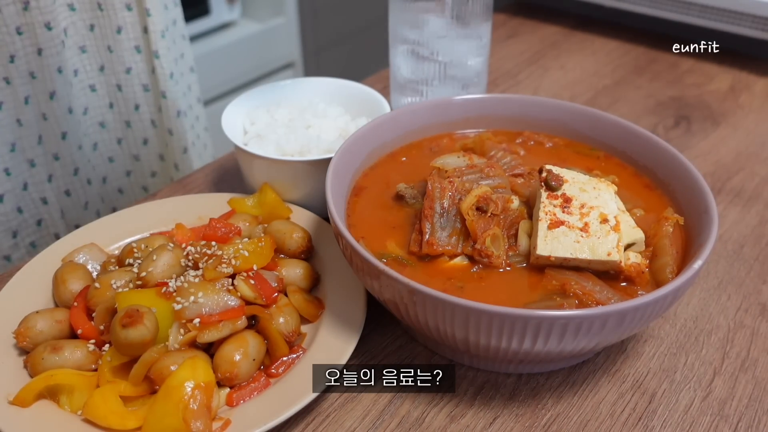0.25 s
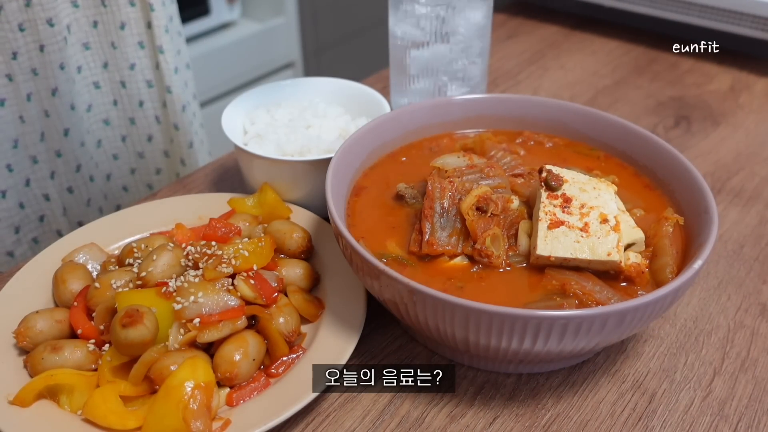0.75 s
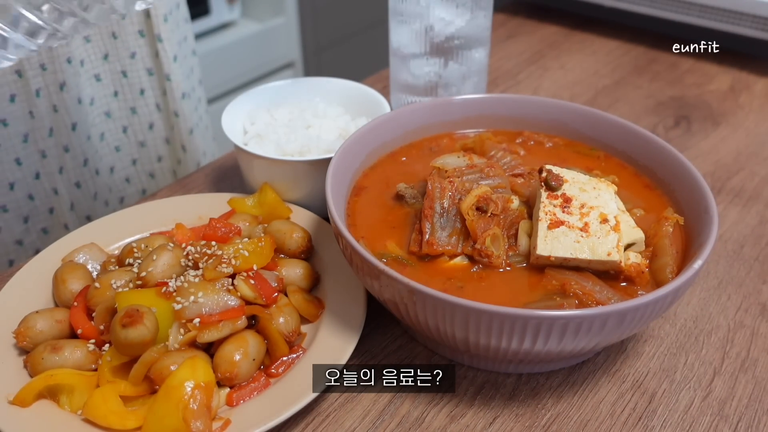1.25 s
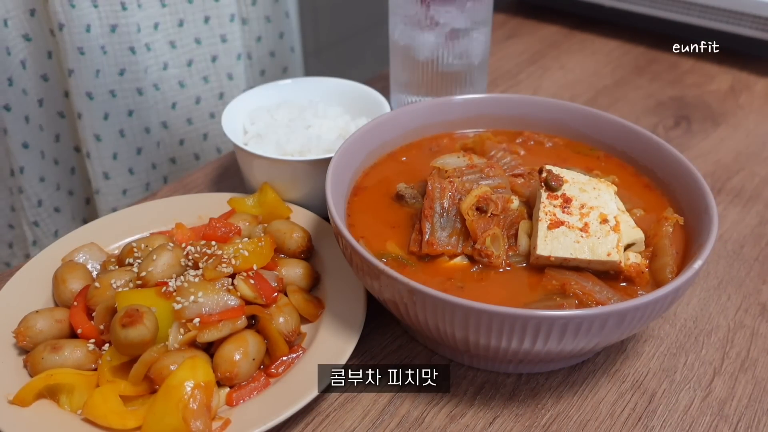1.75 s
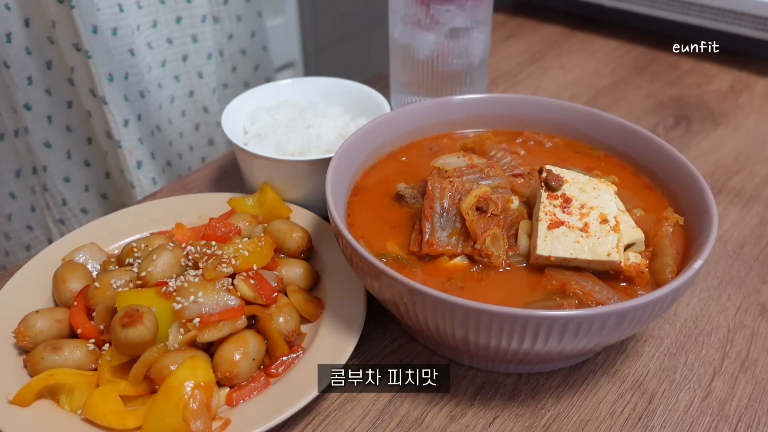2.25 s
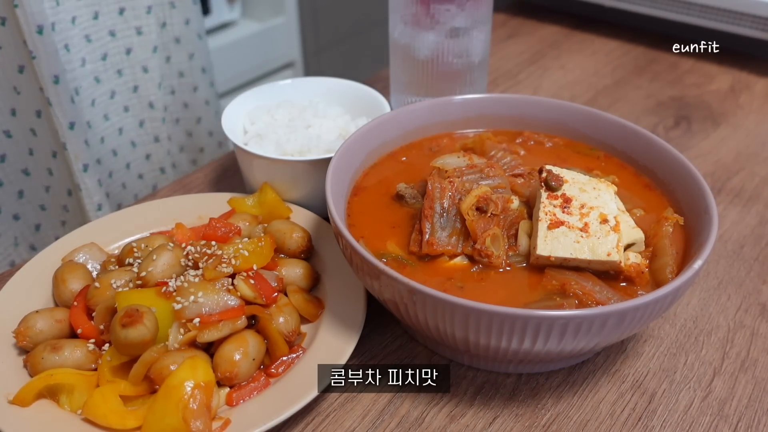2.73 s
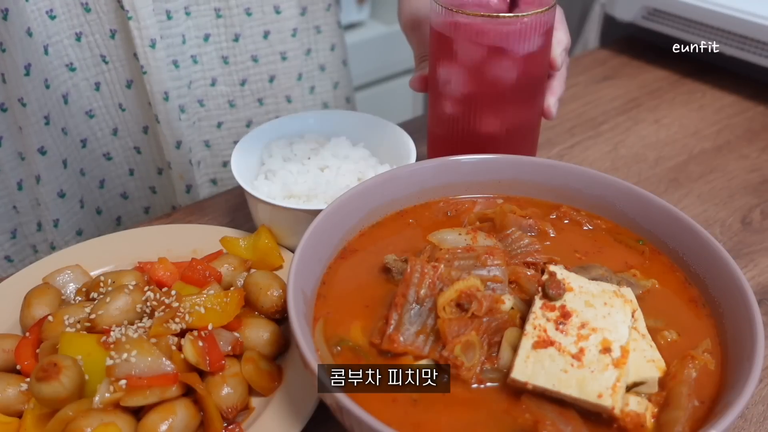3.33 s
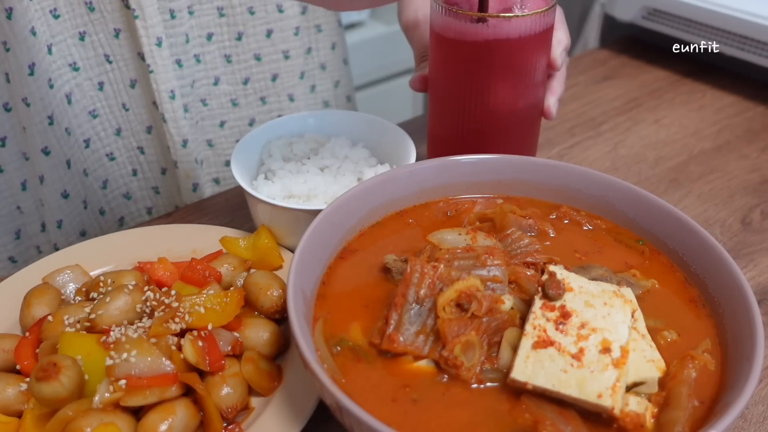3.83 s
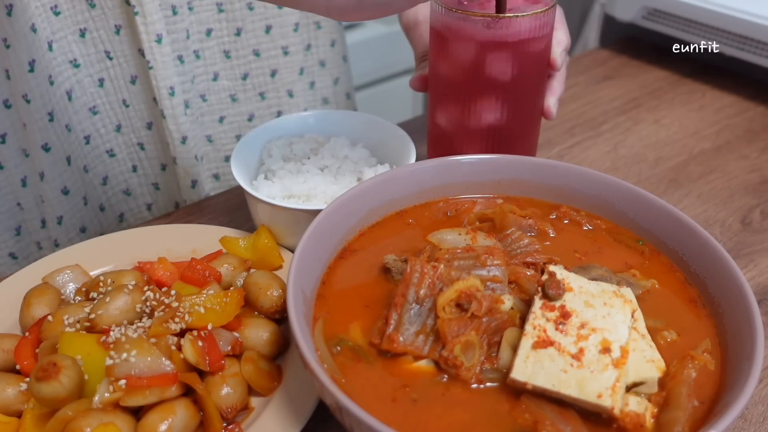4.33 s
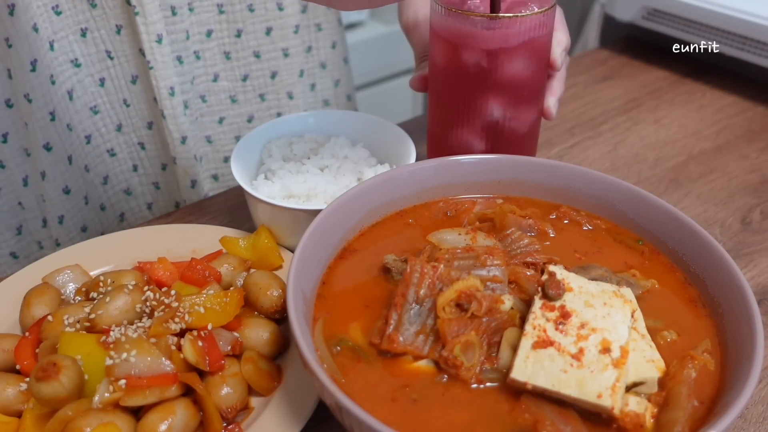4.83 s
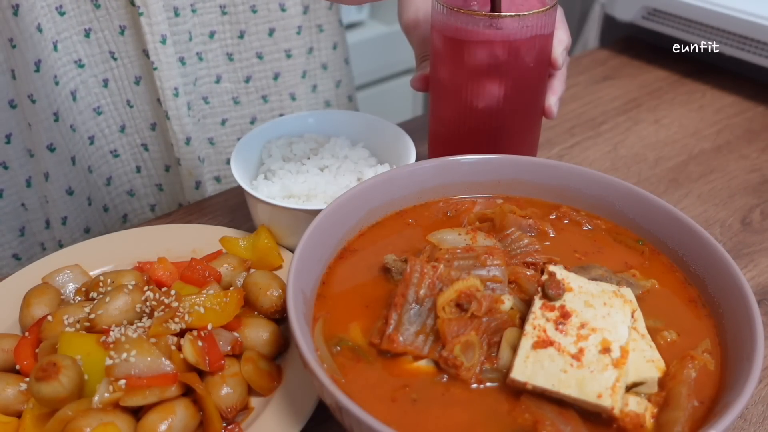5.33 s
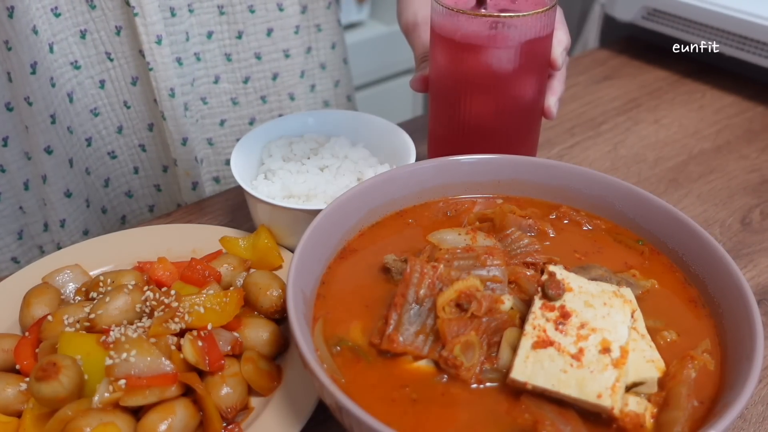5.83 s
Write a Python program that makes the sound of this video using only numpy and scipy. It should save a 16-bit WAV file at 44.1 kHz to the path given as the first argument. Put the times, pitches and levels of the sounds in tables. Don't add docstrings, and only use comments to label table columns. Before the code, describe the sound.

Close in a small room: crackling ice under poured water, a crinkling powder sachet, then dense wet clinking of ice stirred in a glass.

```python
import sys
import numpy as np
from scipy import signal
from scipy.fft import rfft, irfft, next_fast_len
from scipy.io import wavfile
from scipy.ndimage import uniform_filter1d

SR = 44100
rng = np.random.default_rng(int(sys.argv[2]) if len(sys.argv) > 2 else 0)


def store_pcm(level_fs):
    pcm = np.round(np.clip(level_fs, -1, 1) * 32767).astype(np.int16)
    wavfile.write(sys.argv[1], SR, np.atleast_2d(pcm).T)


def ratio_of_db(decibels):
    return 10 ** (np.asarray(decibels, float) / 20)


N = 268128


def in_time(rows):
    start_s, *columns = np.transpose(rows)
    t = np.arange(N) / SR
    inside = (t > start_s[0] - 0.014) & (t < start_s[-1] + 0.012)
    return [np.where(inside, np.interp(t, start_s, column), -150) for column in columns]


def unit_rms(x):
    return x / np.sqrt(np.mean(x ** 2) + 1e-20)


def ring(x, hz, t60_s):
    radius = ratio_of_db(-60 / (t60_s * SR))
    w = 2 * np.pi * np.minimum(hz, 0.45 * SR) / SR
    return signal.lfilter([0, np.sin(w)], [1, -2 * radius * np.cos(w), radius * radius], x + 1e-18)


def fade(x, seconds):
    return signal.lfilter([1], [1, -np.exp(-1 / (seconds * SR))], x + 1e-18)


def train(times_s, gains):
    out = np.zeros(N)
    np.add.at(out, (np.asarray(times_s) * SR).astype(int), gains)
    return out


def contact(times_s, level_db, seconds):
    return fade(fade(train(times_s, ratio_of_db(level_db)), seconds), 0.0002) / (0.00018 * SR)


def touches(t0_s, t1_s, count, spread_db):
    s, size = rng.random((count, 2)).T
    s = t0_s + (t1_s - t0_s) * s
    return s, (s * SR).astype(int), spread_db * np.minimum(-np.log(1 - size), 2.5)


def wavering(hz, blur_hz, size=N):
    jitter = np.sqrt(2 * np.pi * blur_hz / SR) * rng.standard_normal(size)
    return np.sin(np.cumsum(2 * np.pi * hz / SR + jitter))


def above(x, cut_hz, order=3):
    return signal.sosfilt(signal.butter(order, cut_hz, "high", fs=SR, output="sos"), x)


def band(x, low_hz, high_hz):
    return signal.sosfilt(signal.butter(2, [low_hz, high_hz], "band", fs=SR, output="sos"), x)


def strike(times_s, level_db, modes, contact_s, spread_db, cut_hz, blur_hz):
    share = ratio_of_db(spread_db * rng.standard_normal((len(times_s), len(modes))) + np.array(modes)[:, 1])
    share /= np.sqrt(np.sum(share ** 2, axis=1, keepdims=True))
    share *= rng.choice([-1, 1], share.shape)
    out = 0
    for (hz, _, t60_s), own in zip(modes, share.T):
        swing = fade(train(times_s, ratio_of_db(level_db) * own), t60_s / np.log(1000))
        softened = fade(fade(swing, contact_s), contact_s) / (contact_s * SR) ** 2
        out = out + softened * wavering(hz, blur_hz)
    return above(out, cut_hz, order=4)


def grains(modes, per_s, spread_db):
    sizes = ratio_of_db(spread_db * np.minimum(rng.exponential(1, N), 5)) * rng.choice([-1, 1], N)
    sizes *= rng.random(N) < per_s / SR
    dealt = rng.integers(0, len(modes), N)
    out = 0
    for k, (hz, level_db, t60_s) in enumerate(modes):
        out = out + ring(sizes * (dealt == k) * ratio_of_db(level_db), hz, t60_s)
    return unit_rms(out)


def hiss(spectrum):
    hz, level_db = np.transpose(spectrum)
    grid_hz = np.maximum(np.fft.rfftfreq(N, 1 / SR), 1)
    gain = ratio_of_db(np.interp(np.log(grid_hz), np.log(hz), level_db))
    return unit_rms(irfft(rfft(rng.standard_normal(N)) * gain, N))


# start_s, peak_s, end_s, vigour_db, depth_db (depth in the drink)
STROKES = [(2.856, 2.92, 3.058, -15.5, -5), (2.987, 3.016, 3.29, -23, -7), (3.118, 3.14, 3.33, -20, -14),
           (3.186, 3.342, 3.529, -18, -12.5), (3.545, 3.587, 3.615, -31, 8.5),
           (3.631, 3.703, 3.74, -26, -3), (3.763, 3.785, 3.921, -22.5, -2.5),
           (3.866, 3.894, 4.018, -25.5, -1.5), (4.041, 4.069, 4.154, -21.5, -1),
           (4.257, 4.31, 4.36, -25, 1), (4.357, 4.491, 4.82, -21.5, -1.5), (4.693, 4.73, 4.852, -24, -1),
           (4.781, 4.87, 4.966, -26, 1), (4.895, 5.003, 5.046, -26, 0.8), (5.076, 5.214, 5.4, -32.5, 0),
           (5.412, 5.514, 5.66, -22, -2), (5.711, 5.713, 5.853, -27.5, -6.5),
           (5.8, 5.888, 6.047, -37, -6.5)]
RISE_DB, FALL_DB, ONSET_DB_PER_S, REST_DB = 7.5, 12, 902, -46.5


def strokes():
    t = np.arange(N // 16 + 1) * 16 / SR
    start_s, peak_s, end_s, level_db, depth_db = np.transpose(STROKES)[:, :, None]
    rising_db = RISE_DB * (peak_s - t) / (peak_s - start_s) + ONSET_DB_PER_S * np.maximum(start_s - t, 0)
    falling_db = FALL_DB * (t - peak_s) / (end_s - peak_s)
    each_db = level_db - np.where(t < peak_s, rising_db, falling_db)
    vigour_db = np.maximum(each_db.max(axis=0), REST_DB) - 150 * (t < start_s[0] - 0.01)
    depth_db = uniform_filter1d(depth_db[each_db.argmax(axis=0), 0], size=56)
    return np.repeat([vigour_db, depth_db], 16, axis=1)[:, :N]


# start_s, glass_db, tick_db
LONE_CLINKS = [(2.8601, -11, -10), (2.864, -10, -15), (2.8741, -11.5, -9), (2.879, -19, -26),
               (2.889, -16, -19), (2.9013, -14, -23), (2.9073, -17, -24), (2.913, -14, -24),
               (2.9187, -9.5, -14), (2.924, -16, -19), (2.929, -14.5, -24), (2.94, -20, -26),
               (2.971, -27, -42), (2.997, -24, -38), (3.023, -16.5, -24), (3.029, -17, -25),
               (3.055, -29.5, -37.5), (3.091, -27, -42), (2.983, -22, -54), (3.0097, -14.5, -8.5),
               (3.035, -17.5, -28), (3.0676, -23, -41), (3.121, -20, -11.5), (3.137, -17, -15),
               (3.144, -22, -22), (3.1646, -19, -17), (3.1785, -15, -23), (5.573, -22, -44),
               (5.608, -19.5, -35), (5.447, -17, -21), (5.639, -14.5, -37), (5.689, -29, -53),
               (5.7212, -14, -11), (5.7965, -29, -22), (5.819, -21, -20), (5.8443, -25, -21),
               (5.8726, -19, -22.5), (5.8966, -18.5, -18.5), (5.9398, -22, -45), (5.9747, -16.5, -40),
               (5.981, -22, -50), (6.0451, -23.5, -37)]
# start_s, glass_db, tick_db, hollow_db
RATTLE_FIRST = [(3.1922, -13.5, -18, -34.0), (3.2026, -12, -22.0, -30), (3.2177, -16, -19.0, -38),
                (3.228, -11, -18.0, -38), (3.2458, -11.5, -21, -34), (3.2577, -14.0, -27, -27),
                (3.2659, -11, -29, -30), (3.2823, -13.0, -27, -26.0), (3.2894, -11, -25, -25),
                (3.297, -11, -17.0, -21), (3.304, -10, -21, -21.5), (3.3112, -7, -18, -24),
                (3.326, -11.5, -14, -18), (3.335, -5, -14.5, -22), (3.3487, -11.5, -15.0, -23),
                (3.3562, -11, -14.0, -21), (3.362, -10, -18, -23.5), (3.37, -11, -13, -20),
                (3.3777, -11, -14, -26), (3.385, -16, -14, -25.0), (3.3932, -11.0, -16.0, -27),
                (3.4069, -14.5, -20, -25), (3.4217, -20, -15.0, -36), (3.4326, -8.5, -13, -30.0),
                (3.4473, -16, -18.5, -32.5), (3.4555, -19, -11, -33), (3.4653, -14.5, -12.5, -31.5),
                (3.4752, -22, -14, -34.5), (3.4877, -28, -18, -32), (3.5215, -26, -22.0, -31),
                (3.535, -27, -20, -39.0), (3.546, -24.5, -20, -31.5), (3.5584, -21.0, -29, -21.5),
                (3.5773, -21.5, -28.5, -13.5), (3.6352, -20, -23.0, -25), (3.641, -17, -37, -26.0),
                (3.6552, -21, -35, -26), (3.6652, -16, -19, -25.5), (3.6768, -21, -29, -23.0),
                (3.6871, -19.0, -21, -23.5), (3.702, -17.5, -26.5, -18.5), (3.7175, -15, -25.0, -23.0),
                (3.7278, -11.5, -23.0, -15.0), (3.7377, -21.5, -26.0, -20), (3.7536, -19, -30, -18.5),
                (3.773, -14.0, -16.5, -16)]
RATTLE_MIDDLE = [(3.787, -12, -34, -25), (3.795, -16.0, -34, -23.5), (3.832, -16, -32, -25.5),
                 (3.8474, -15, -24, -15), (3.857, -17, -29, -20.0), (3.8713, -20, -34, -32),
                 (3.886, -17, -21, -22), (3.894, -6, -19, -16), (3.9085, -16.5, -27.0, -26),
                 (3.9344, -18.5, -16, -29.5), (3.94, -14, -19.5, -24), (3.9546, -20.0, -24.0, -31),
                 (3.976, -18.5, -22.5, -22), (4.0502, -16, -27, -20.5), (4.063, -11.5, -14, -9.5),
                 (4.077, -19, -21, -13.5), (4.086, -11, -20.5, -27), (4.0964, -12, -20, -13.5),
                 (4.1097, -16, -29.5, -17), (4.2037, -26.5, -41, -31), (4.2134, -26.5, -41.5, -30),
                 (4.2677, -15, -23.0, -24), (4.2829, -19, -24, -19), (4.3003, -12, -25.0, -23),
                 (4.309, -7, -21.0, -23), (4.3197, -14.5, -23.0, -26.0), (4.3273, -9, -24, -21.5),
                 (4.3558, -14.5, -24.5, -33), (4.3789, -20, -15, -30.0), (4.3928, -11, -11.5, -13.5),
                 (4.425, -16, -21.0, -29), (4.4443, -10.5, -15, -25), (4.4553, -11, -27, -28),
                 (4.473, -11, -28, -25), (4.4866, -9, -23.0, -22), (4.4992, -9, -22, -21),
                 (4.506, -14, -22, -19), (4.526, -15, -29, -29), (4.5404, -18, -31, -30),
                 (4.545, -16, -30, -28), (4.5589, -13, -21, -23.5), (4.5638, -14, -24, -23.0),
                 (4.5862, -21.0, -33, -26), (4.6259, -15, -23.5, -16), (4.6429, -20, -28, -26.0),
                 (4.6506, -20.0, -25, -20)]
RATTLE_LAST = [(4.7004, -16.5, -24, -15), (4.7111, -11, -31, -16), (4.7286, -16, -32, -27),
               (4.7452, -13, -34, -21), (4.7557, -14.5, -27, -22.5), (4.7742, -15, -25.0, -19),
               (4.7955, -11.5, -25, -19), (4.8194, -25.0, -35, -29), (4.834, -24.5, -37.0, -26),
               (4.8437, -19.0, -25, -24.0), (4.8549, -17.5, -20.5, -23), (4.894, -28, -30.0, -19),
               (4.9034, -17.0, -21.5, -20.5), (4.93, -20.0, -33.0, -16), (4.9438, -14.5, -18.5, -22.0),
               (4.954, -19, -30, -25), (4.9663, -7, -31, -20), (4.9904, -14, -36, -17.0),
               (5.0018, -14, -27, -24), (5.0156, -16, -37, -26.0), (5.0234, -11, -18.5, -18),
               (5.075, -22, -32.0, -26.5), (5.1201, -27.0, -37, -33.5), (5.1264, -21.5, -37.5, -27),
               (5.1423, -28, -27, -26), (5.1707, -23, -36.5, -24), (5.191, -26.0, -37.5, -30),
               (5.1986, -18, -38.5, -30.0), (5.208, -14, -23, -26), (5.236, -16, -25, -28),
               (5.246, -17, -21, -22.5), (5.253, -17.5, -29.0, -31), (5.279, -21, -27, -28.5),
               (5.303, -23, -23, -40.5), (5.3512, -36.0, -43.5, -30.0), (5.3705, -25, -35, -33.5),
               (5.4157, -23.0, -40, -43), (5.4253, -21, -37, -42), (5.4545, -16, -19.5, -21),
               (5.4677, -16, -42, -23), (5.4756, -7, -30, -15.5), (5.4895, -21.0, -22.5, -18),
               (5.5047, -13.0, -16, -18.0), (5.526, -10, -13, -20), (5.5377, -15, -27, -24),
               (5.5502, -17.5, -21, -26)]
# pitch_hz, level_db, t60_s
FULL_GLASS = [(2150, -10, .012), (2400, -4, .016), (2620, -1, .015), (2950, -8, .012), (3320, -2, .015),
              (3800, -7, .01)]
KNOCK = [(1128, -8, 0.032), (1279, -4.5, 0.03), (1533, 5.5, 0.014), (1763, 5.5, 0.014), (2004, 1.5, 0.008)]
SLOSH = [(651, -4, 0.012), (818, -5.5, 0.036)]
# pitch_hz, level_db (per Hz)
TICK = [(2470, -18.5), (4200, 1.5), (5650, 0.5), (7600, -3.5), (8960, -5.5), (9940, -8), (15600, -16.5)]


def stirring():
    jostle_db, depth_db = strokes()
    knock_db = jostle_db + depth_db
    slosh_db = -35.0 + 0.72 * (jostle_db + 30.0) + 2.17 * depth_db - 150 * (jostle_db < -99)
    muffle_db = -0.27 * (depth_db + 13.5)

    lone = np.transpose(LONE_CLINKS)
    k = (lone[0] * SR).astype(int)
    lone_hollow_db = knock_db[k] - 5.5 + 0.61 * (lone[1] - jostle_db[k])
    rattle = np.transpose(RATTLE_FIRST + RATTLE_MIDDLE + RATTLE_LAST)
    s, glass_db, tick_db, hollow_db = np.c_[np.r_[lone, [lone_hollow_db]], rattle]
    j = (s * SR).astype(int)
    small_s, i, size_db = touches(3.2, 6.07, count=1300, spread_db=5.5)
    every_s = np.r_[s, small_s]

    small_glass_db = jostle_db[i] - 1.5 + 0.15 * np.minimum(depth_db[i], 0) + size_db
    glass = strike(every_s, np.r_[glass_db + 8.0, small_glass_db], FULL_GLASS, 0.00057, 4.8, 2480, 189.4)
    knocks_db = np.r_[hollow_db + 7.5, knock_db[i] - 1.5 + size_db]
    knocks = strike(every_s, knocks_db, KNOCK, 0.00077, 5.0, 600, 110.1)
    main_slosh_db = slosh_db[j] - 3.5 + 0.4 * (glass_db - jostle_db[j])
    sloshes_db = np.r_[main_slosh_db, slosh_db[i] - 7 + size_db]
    slosh = strike(every_s, sloshes_db, SLOSH, 0.0026, 5.4, 350, 38.8)
    ticks_db = np.r_[tick_db + 1.5, jostle_db[i] + muffle_db[i] - 10.5 + size_db]
    ticks = contact(every_s, ticks_db, 0.0011) + ratio_of_db(jostle_db + muffle_db - 19.5)
    return glass + knocks + slosh + above(ticks * hiss(TICK), 1800)


# start_s, crack_db, clink_db
CRACKS = [(0.0056, -9, -28), (0.0137, -17, -47), (0.0682, -10, -48), (0.1189, -5.5, -35),
          (0.131, -9.5, -42), (0.146, -13, -22.5), (0.183, -13, -45), (0.227, -7, -25.5),
          (0.3036, -8, -18.5), (0.3314, -11.5, -48), (0.381, -4, -35), (0.399, -8, -22),
          (0.492, -25, -17.5), (0.523, -9, -44), (0.5537, -9, -38), (0.564, -5.5, -29), (0.637, -10, -43),
          (0.6454, -13, -39), (0.712, -27, -24), (0.7645, -3.5, -14.5), (0.913, -34, -18),
          (0.9951, -29, -21), (1.0283, -46, -19), (1.06, -53, -26), (1.084, -28, -19), (1.15, -24, -40),
          (1.21, -38, -25), (1.2368, -36, -23), (1.265, -29, -32), (1.2794, -31, -48), (1.304, -45, -30),
          (1.495, -48, -31), (1.5387, -58, -22.5)]
# start_s, jostle_db
POUR = [
    (0.0, -44),
    (0.45, -39.5),
    (0.71, -30.5),
    (0.75, -42),
    (0.78, -32.5),
    (0.97, -41),
    (1.09, -29),
    (1.2, -45),
    (1.39, -50.5),
    (1.58, -38.5),
]
# pitch_hz, level_db, t60_s
CLINK = [(2540, 1, 0.004), (3040, 2, 0.008), (3620, -4.5, 0.039), (3870, -5.5, 0.043), (4220, -5, 0.017),
         (4690, -1.5, 0.0069), (5880, 1, 0.0074)]
# pitch_hz, level_db (per Hz)
FIZZ = [(1470, -61), (2500, -44), (3270, -8.5), (3840, -30), (4180, -10), (4760, -8), (7360, 4),
        (15600, -1)]
FRESH_DB, FRESH_S, FIZZ_DB = 30.5, 0.37, -6.5
GURGLE_DB, GURGLE_FOLLOWS = -39, 0.57
POOL_S, DEEP_S, SHALLOW_DB, LOW_BUBBLES_DB = 0.21, 0.43, -3.5, -5


def pouring():
    s, crack_db, clink_db = np.transpose(CRACKS)
    t = np.arange(N) / SR
    jostle_db, = in_time(POUR)
    fizz_db = jostle_db + FIZZ_DB + FRESH_DB * np.exp(-t / FRESH_S)
    gurgle_db = GURGLE_DB + GURGLE_FOLLOWS * (jostle_db + 39)
    gurgle_db = gurgle_db + SHALLOW_DB * (t < POOL_S) - 150 * (jostle_db < -99)

    small_s, i, size_db = touches(0, 1.59, count=700, spread_db=7.0)
    sparkle = contact(small_s, fizz_db[i] - 10.5 + size_db, 0.00094)
    bright = (contact(s, crack_db + 6.5, 0.00065) + sparkle + ratio_of_db(fizz_db - 5.0)) * hiss(FIZZ)
    clinks_db = np.r_[clink_db + 5, jostle_db[i] - 3 + size_db]
    clinks = strike(np.r_[s, small_s], clinks_db, CLINK, 0.00027, 3.7, 1100, 135.0)

    water = [(hz, 0, 69.0 / hz) for hz in np.geomspace(580, 2300, 16)]
    low_gain = ratio_of_db(LOW_BUBBLES_DB + 1.2 * SHALLOW_DB * (t < DEEP_S))
    low = low_gain * grains(water[:5], per_s=300.0, spread_db=5.5)
    bubbles = low + 0.83 * grains(water[5:], per_s=600.0, spread_db=2.5)
    return above(bright, 1500) + clinks + ratio_of_db(gurgle_db) * bubbles


# start_s, crack_db
VENTS = [(0.0054, -6), (0.121, 2.5), (0.227, -3), (0.3038, -3.5), (0.376, 4), (0.3985, 1.5), (0.5222, -7),
         (0.5621, 2), (0.638, -3), (0.766, 5), (2.548, -11), (2.7653, -9), (5.72, -3.5)]


def venting():
    s, crack_db = np.transpose(VENTS)
    return fade(contact(s, crack_db - 17.0, 0.041), 0.0095) / (0.015 * SR) * hiss(FIZZ)


# start_s, peak_db, pitch_hz
GLUGS = [(0.085, -32, 1380), (0.108, -39, 1210), (0.2264, -32, 1310), (0.2583, -25.5, 1340),
         (0.3407, -23, 1458), (0.363, -31, 1474), (0.396, -32, 1500), (0.4353, -29.5, 735),
         (0.46, -27, 1194), (0.49, -20.5, 1580), (0.5415, -32.5, 820), (0.7116, -20, 654),
         (0.759, -31, 1915), (0.913, -29, 1500), (0.9941, -27, 1263), (1.0618, -24.5, 1560),
         (1.084, -22, 1956), (1.1493, -30.5, 769), (1.238, -31.5, 1500), (1.305, -31.5, 1330),
         (1.3737, -40, 804.9), (1.5687, -31.5, 778)]
# start_s, peak_db, pitch_hz
THUNKS = [
    (.066, -30, 1302),
    (.6, -21, 1570),
    (3.553, -21, 1620),
    (3.578, -20.5, 743.9),
    (3.94, -28, 674.2),
    (5.5, -19.5, 990),
    (5.64, -23, 1550),
    (4.215, -30, 854),
    (5.15, -31, 726),
]
CLIMB_PER_S = 2.5


def glugs():
    out, age_s = np.zeros(N), np.arange(2500) / SR
    shape = np.exp(-age_s / 0.0094) * (1 - np.exp(-age_s / 0.0022))
    for start_s, level_db, hz in GLUGS + THUNKS:
        tone = wavering(hz * (0.96 + CLIMB_PER_S * age_s), 83.0, size=2500)
        out[int(start_s * SR):][:2500] += ratio_of_db(level_db + 6.5) * shape * tone
    return band(out, 480, 2800)


# start_s, peak_db, pitch_hz, t60_s
PINGS = [
    (0.565, -21, 4169, 0.19),
    (0.7644, -21, 3950, 0.32),
    (3.121, -2, 3290, 0.021),
    (3.137, -2, 3280, 0.03),
    (5.722, -21, 8250, 0.17),
]


def pings():
    age_s, out = np.arange(9000) / SR, np.zeros(N)
    for start_s, level_db, hz, t60_s in PINGS:
        shape = ratio_of_db(level_db - 60 * age_s / t60_s) * (1 - np.exp(-age_s / 0.0004))
        out[int(start_s * SR):][:9000] += shape * wavering(hz, 30.0, size=9000)
    return above(out, 2300)


# start_s, body_db, crackle_db
SNAPS = [(1.683, -24, -23), (1.705, -28.5, -39), (1.8509, -29, -32), (1.961, -21.5, -26),
         (1.995, -18.5, -18.5), (2.099, -17, -44), (2.1688, -20.5, -29), (2.1911, -15, -18.5),
         (2.207, -29, -30), (2.226, -12, -23), (2.284, -19, -17.5), (2.297, -23, -23), (2.3208, -18, -24.5),
         (2.3284, -20.5, -42), (2.39, -23.5, -49), (2.4185, -18, -20.5), (2.4292, -20, -27),
         (2.4348, -16, -28), (2.462, -29, -22), (2.5216, -30, -22), (2.526, -23, -23),
         (2.5517, -18.5, -12.5), (2.654, -22.5, -26.5), (2.672, -18, -18.5), (2.676, -39, -21),
         (2.6912, -14, -19.5), (2.7662, -21, -15.5), (2.7757, -21, -28), (2.7915, -17, -16)]
# start_s, flow_db
POWDER = [
    (1.61, -38.5),
    (2.0, -33),
    (2.16, -60),
    (2.2, -38),
    (2.38, -47.5),
    (2.56, -44),
    (2.64, -61),
    (2.68, -29.5),
    (2.83, -66),
]
# pitch_hz, level_db, t60_s
FOIL = [(1158, -9.5, 0.025), (1500, -1, 0.0087), (2040, -1, 0.016), (2310, 4, 0.0096), (2860, 1.5, 0.007),
        (3600, -7, 0.017)]
# pitch_hz, level_db (per Hz)
DUST = [(2060, -47), (3500, -4), (5160, -3.5), (7650, -1.5), (15600, -8)]
RUSTLE = [(410, -16), (700, -21), (1160, -8.5), (1610, -3.5), (2550, -2.5), (6000, -12.5), (7800, -45),
          (13200, -120)]
RUSTLE_DB, RUSTLE_FOLLOWS = -45, 0.27
GRIP_DB_PER_S, GRIP_S = 26, 2.15
CREASE_S, CREASE_DB = 0.03, -14


def sachet():
    s, body_db, crackle_db = np.transpose(SNAPS)
    late, size = rng.random((len(s), 2)).T
    s = np.r_[s, s + CREASE_S * (0.25 + 0.75 * late)]
    loss_db = CREASE_DB - 8.6 * size
    body_db = np.r_[body_db, body_db + loss_db]
    crackle_db = np.r_[crackle_db, crackle_db + loss_db]
    body = strike(s, body_db + 6.5, FOIL, 0.00032, 5.3, 1110, 240.9)
    crackle = contact(s, crackle_db + 5.0, 0.0008) * hiss(TICK)

    t = np.arange(N) / SR
    dust_db, = in_time(POWDER)
    rustle_db = RUSTLE_DB + RUSTLE_FOLLOWS * (dust_db + 44.5)
    rustle_db = rustle_db - GRIP_DB_PER_S * np.maximum(GRIP_S - t, 0) - 150 * (dust_db < -99)
    return body + crackle + ratio_of_db(dust_db - 6.5) * hiss(DUST) + ratio_of_db(rustle_db) * hiss(RUSTLE)


# start_s (centre), level_db
ROCKS = [(2.92, -51), (3.34, -41.5), (3.59, -40), (3.77, -44.5), (3.93, -41), (4.081, -50), (4.33, -48),
         (4.5, -38.5), (4.72, -42.5), (4.88, -43), (5.03, -38.5), (5.25, -44), (5.52, -35.5), (5.73, -62)]
# pitch_hz, level_db, t60_s
TABLE = [(142, -6, 0.094), (193.8, 5.5, 0.078), (244, -8, 0.044), (298.4, 5, 0.048)]
ROCK_S, HELD_DB = 0.13, -54.5


def table_top():
    t, push = np.arange(N) / SR, 0
    for centre_s, level_db in ROCKS:
        push = push + ratio_of_db(level_db) * np.maximum(1 - ((t - centre_s) / ROCK_S) ** 2, 0) ** 2
    held = ratio_of_db(HELD_DB) * (t > STROKES[0][0])
    return (push + held) * grains(TABLE, per_s=900.0, spread_db=-0.5)


def bowls(glass):
    scatter = rng.standard_normal(900) * np.exp(-np.arange(900) / 200)
    source = band(glass, 330, 1600) + 1.1 * above(glass, 3000)
    return ratio_of_db(-44) * signal.fftconvolve(source, scatter)[:N] * [[1], [-1]]


ROOM_T60_S, ROOM_DB, ROOM_CUT_HZ = 0.16, -12, 6000


def room(x):
    size = next_fast_len(N + SR)
    w = 2 * np.pi * np.fft.rfftfreq(size)
    dull = 1 / (1 + 1j * w * SR / (2 * np.pi * ROOM_CUT_HZ))
    out = np.zeros((2, len(w)), complex)
    for k, lag in enumerate((rng.uniform(0.0051, 0.024, 16) * SR).astype(int)):
        loop = ratio_of_db(-60 * lag / SR / ROOM_T60_S) * dull * np.exp(-1j * w * lag)
        out[k % 2] += loop / (1 - loop) * (-1) ** (k // 2)
    return irfft(out * rfft(x, size), size)[:, :N]


# pitch_hz, level_db (per Hz)
ROOM_TONE = [(25, -74), (139, -20.5), (172, -12), (314, -18.5), (350, -9), (515, -27.5), (1000, -27),
             (1300, -59)]
ROOM_TONE_DB = -57.5


def room_tone():
    return ratio_of_db(ROOM_TONE_DB) * (hiss(ROOM_TONE) + 0.55 * hiss(ROOM_TONE) * [[1], [-1]])


def scene():
    glass = stirring() + pouring() + venting() + glugs() + pings() + sachet() + table_top()
    wet = room(glass)
    middle = wet.mean(axis=0)
    wet = middle + 0.022 * (wet - middle)
    direct = glass * ratio_of_db(np.array([[-0.1], [0.1]]))
    return direct + bowls(glass) + ratio_of_db(ROOM_DB) * wet + room_tone()


def roll_off(x):
    return signal.sosfilt(signal.butter(12, 17030, fs=SR, output="sos"), x)


def record(dry):
    rounded = 1.15 * np.tanh(dry / 1.4)
    thin = above(rounded, 108, order=4)
    mix = signal.sosfilt(signal.cheby2(8, 20, 16100, fs=SR, output="sos"), thin)
    return roll_off(mix)


dry = scene()
out = record(dry)
store_pcm(out)
```